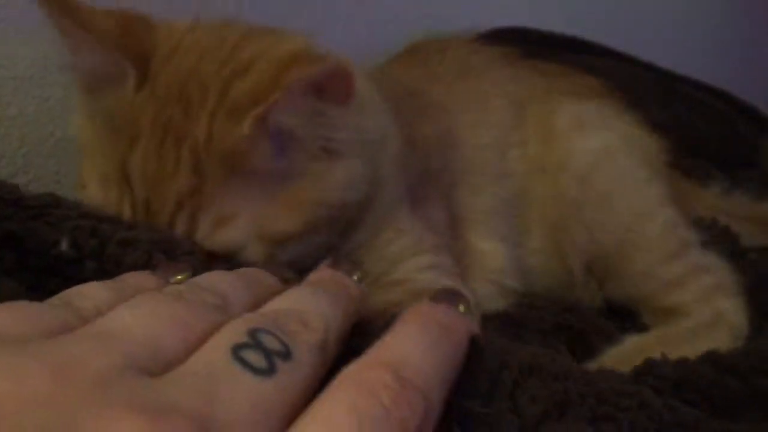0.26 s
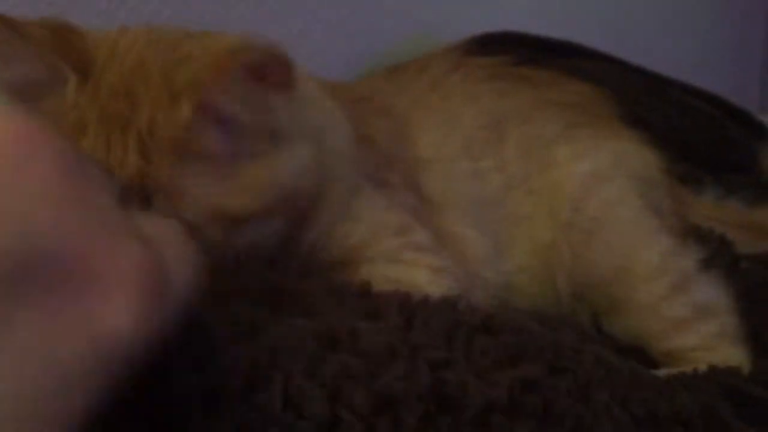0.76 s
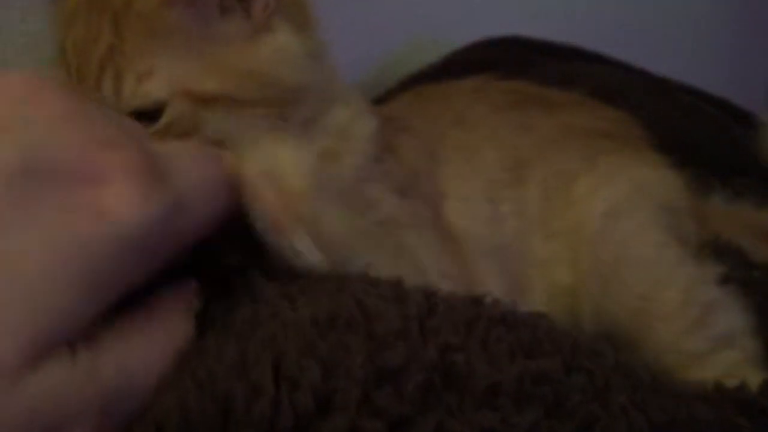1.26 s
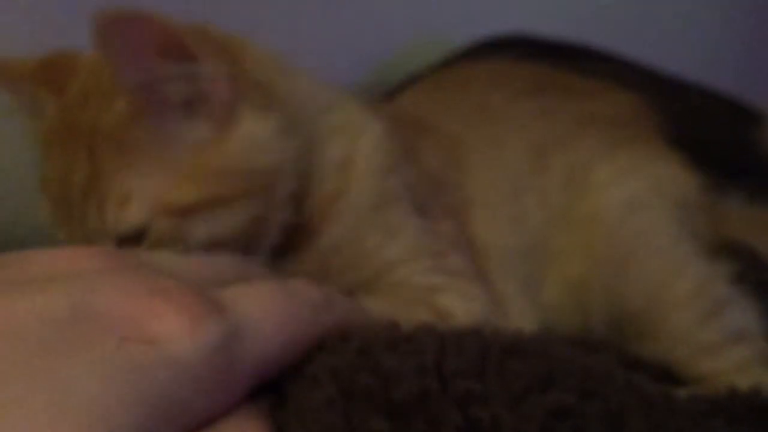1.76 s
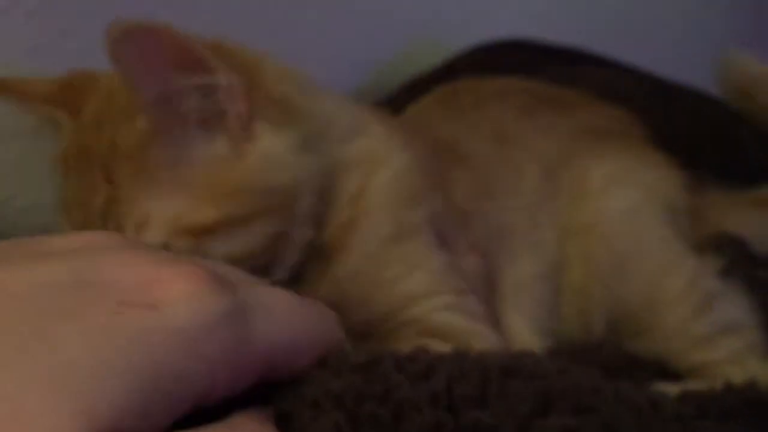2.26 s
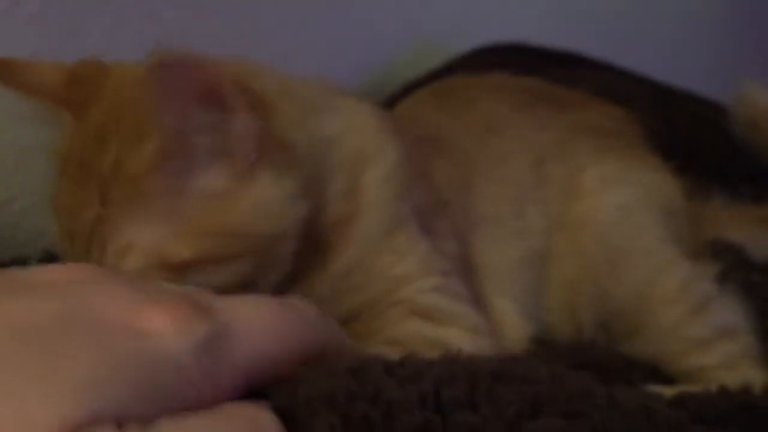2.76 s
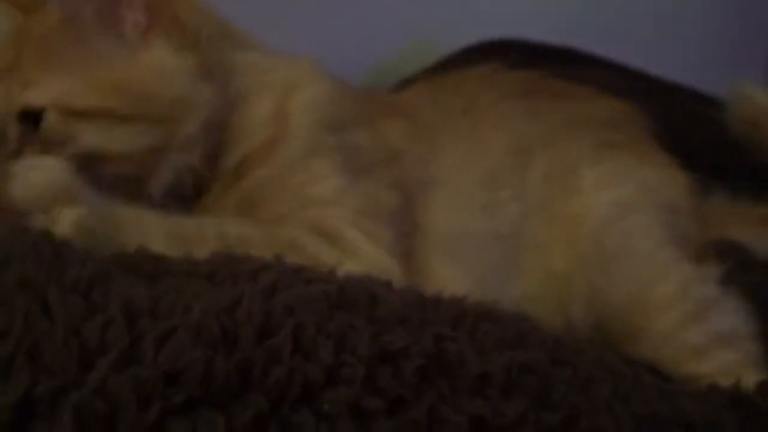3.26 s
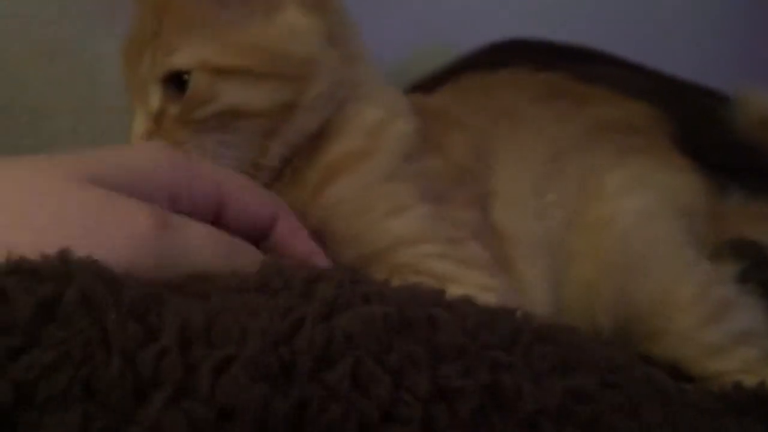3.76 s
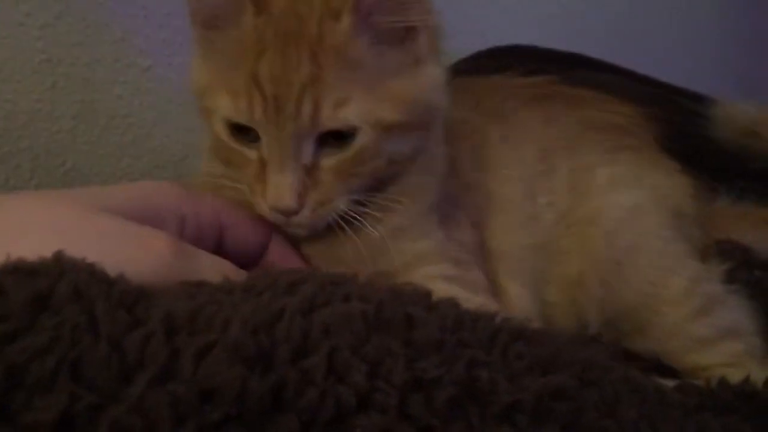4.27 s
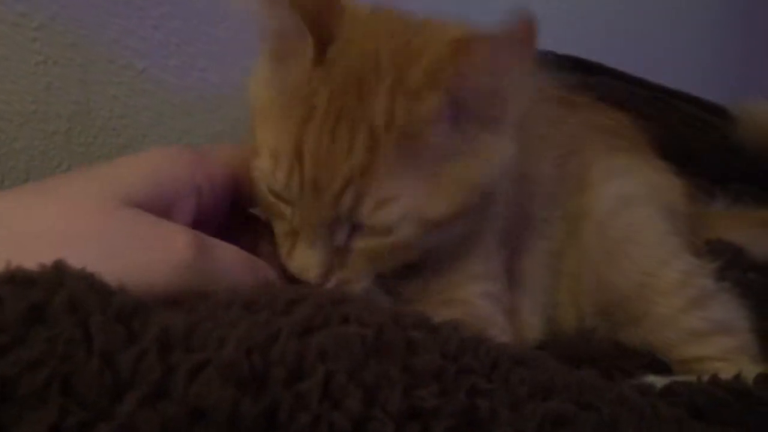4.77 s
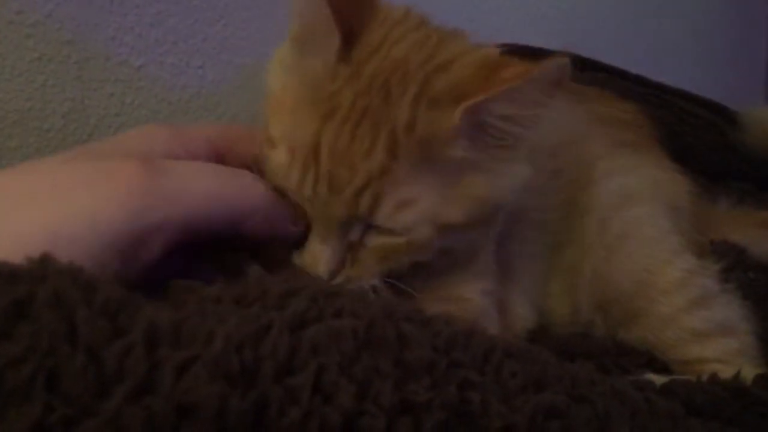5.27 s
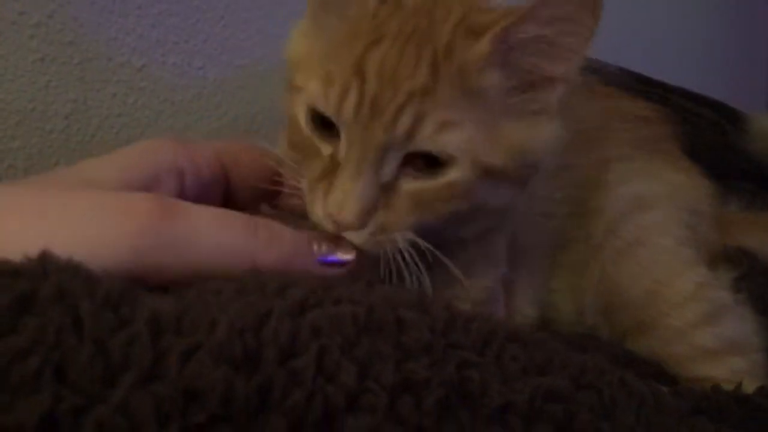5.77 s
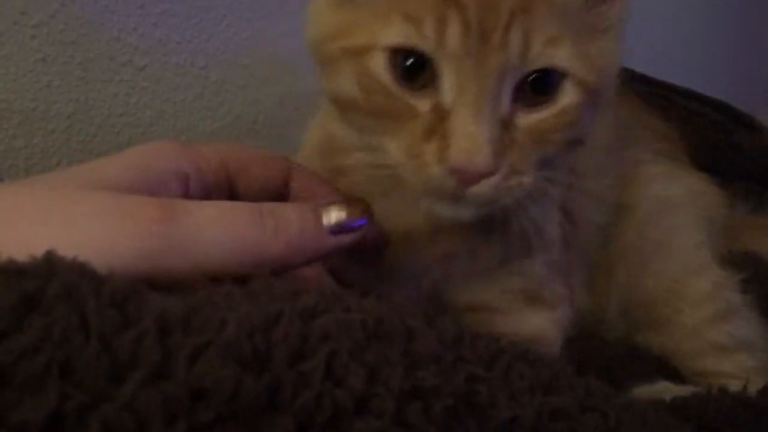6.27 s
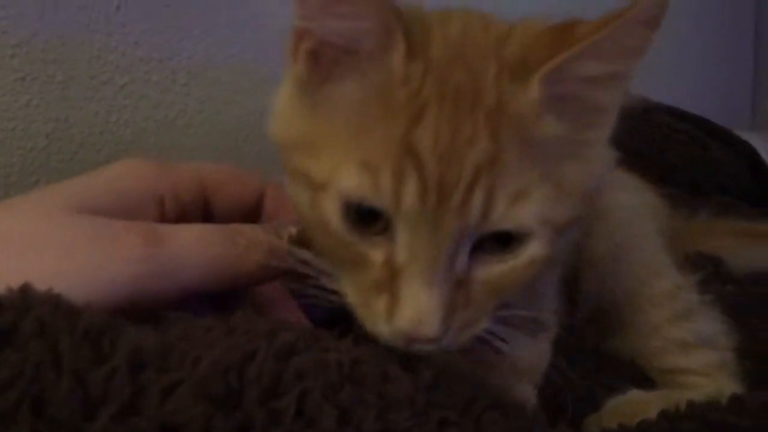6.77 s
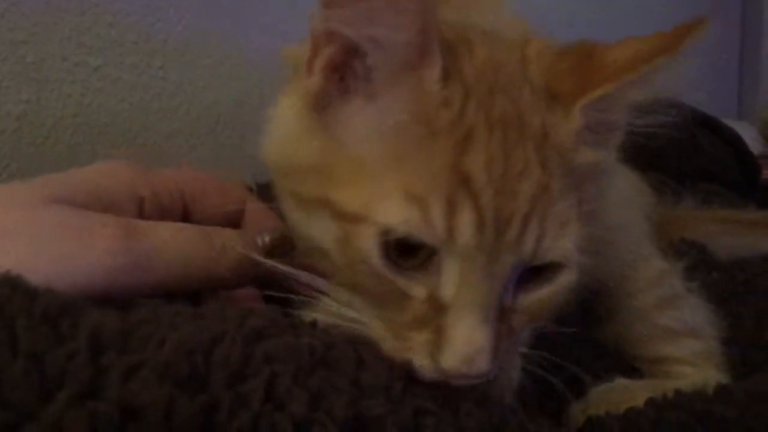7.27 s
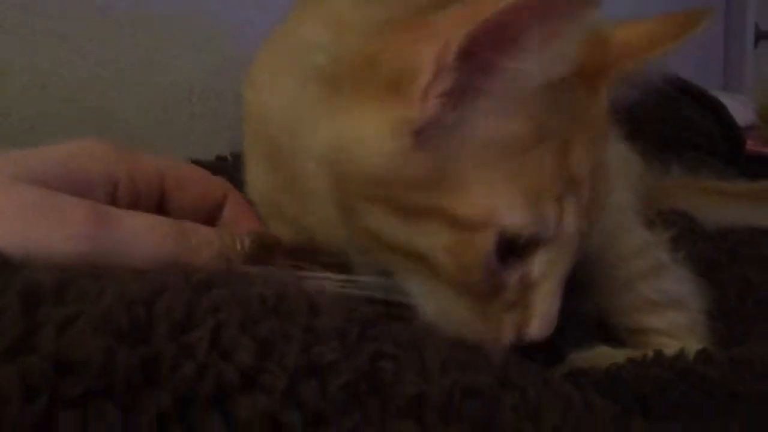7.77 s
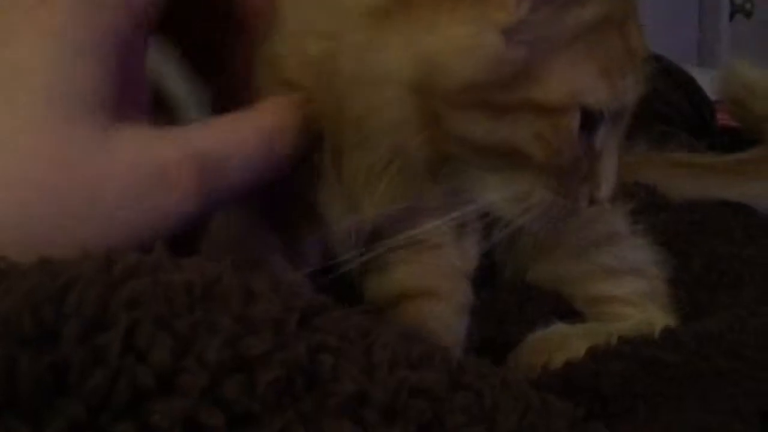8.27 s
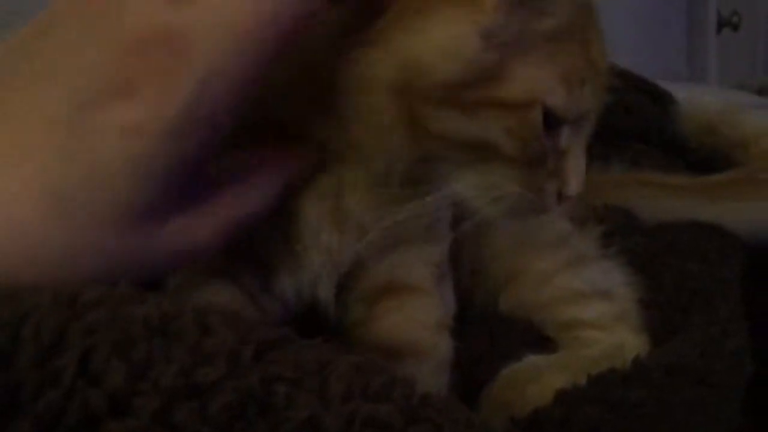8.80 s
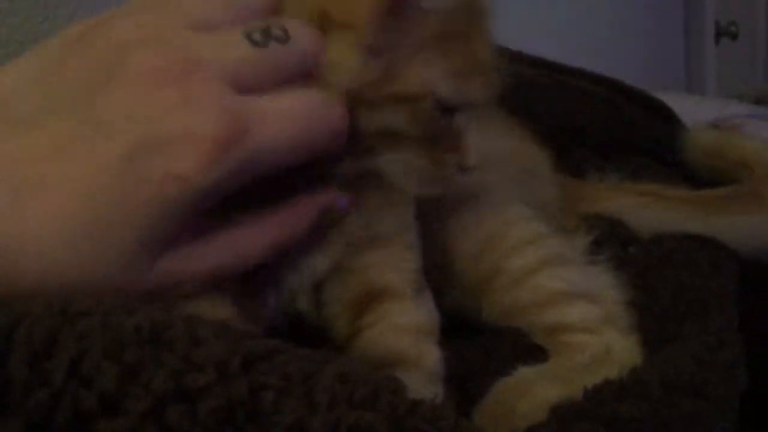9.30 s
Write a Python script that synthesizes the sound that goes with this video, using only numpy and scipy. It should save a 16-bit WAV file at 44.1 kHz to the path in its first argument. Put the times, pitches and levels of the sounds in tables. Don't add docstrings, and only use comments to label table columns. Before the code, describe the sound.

Close, soft kitten purring pulses in and out over faint hum and hiss, interrupted by small ticks, blanket bumps and a few sharp dry knocks.

```python
import sys
import numpy as np
from scipy import signal
from scipy.io import wavfile
from scipy.ndimage import uniform_filter1d

SR = 44100
rng = np.random.default_rng(int(sys.argv[2]) if len(sys.argv) > 2 else 0)


def digitize_waveform(pressure):
    field = np.atleast_2d(pressure).T
    bounded = np.clip(field, -1, 1)
    quanta = np.round(bounded * 32767).astype(np.int16)
    wavfile.write(sys.argv[1], SR, quanta)


def to_linear_factor(level_db):
    exponent = np.asarray(level_db, float) / 20
    return 10 ** exponent


N = 420713


def evened(x):
    return x / np.sqrt(np.mean(x ** 2) + 1e-20)


def read(points, hz):
    f, value = np.transpose(points)
    return np.interp(np.log(hz + 1), np.log(f + 1), value)


def add(mix, s, sound):
    part = mix[max(round(s * SR), 0):][:len(sound)]
    part += sound[:len(part)]


def resonate(x, hz, width, order=1):
    turn = np.exp(2j * np.pi * np.cumsum(hz * np.ones(len(x))) / SR)
    r = np.exp(-np.pi * width / SR)
    low = x / turn
    for _ in range(order):
        low = signal.lfilter([1 - r], [1, -r], low)
    return 2 * (turn * low).real


def steep(x, hz, width):
    return resonate(x, hz, width, order=4)


def hiss():
    # frequency in Hz, level in dB.
    floor_colour = [(82, -38), (140, -2.5), (164, -3.5), (204, -9), (259, -14), (328, -28.5), (425, -26),
                    (632, -31), (786, -29.5), (1700, -32.5), (4870, -41.5), (5590, -41), (8830, -44),
                    (15100, -48), (16000, -56.5)]
    level_db = -74
    frames, hz = N // 256 + 5, np.fft.rfftfreq(1024, 1 / SR)
    a, b, patches = rng.standard_normal((frames, 513, 3)).T
    patches = evened(uniform_filter1d(uniform_filter1d(patches, 12, 0), 14, 1))
    z = (a + 1j * b) * to_linear_factor(read(floor_colour, hz)[:, None] + 0.8 * patches)
    upper = z * (hz > 1000)[:, None]
    scale = np.std(signal.istft(upper, nperseg=1024, noverlap=768)[1])
    return to_linear_factor(level_db) * signal.istft(z, nperseg=1024, noverlap=768)[1][:N] / scale


def slow_drift():
    return evened(resonate(rng.standard_normal(N), 0, 3.53))


def hum():
    # frequency in Hz, wander in Hz, level in dB.
    hum_lines = [(50.3, 2.1, -61), (58.86, 1.83, -61), (119.8, 0.64, -51.5)]
    # centre in Hz, width in Hz, level in dB.
    rumble = [(51.4, 8.9, -62), (97, 64, -64.5), (125, 18.6, -62.5), (33.2, 44, -79.5)]
    out = np.zeros(N)
    for hz, wander, db in hum_lines:
        level = to_linear_factor(db - 0.5 + 2.0 * slow_drift())
        out += level * np.sin(2 * np.pi * np.cumsum(hz + wander * slow_drift()) / SR)
    for hz, width, db in rumble:
        out += to_linear_factor(db) * evened(resonate(rng.standard_normal(N), hz, width, order=2))
    return out


def room_tail():
    # frequency in Hz, time to fall 60 dB in seconds.
    decay = [(500, 0.22), (1500, 0.25), (4000, 0.19), (8000, .14), (15000, 0.081)]
    # delay in seconds, level in dB.
    echoes = [(.006, 4), (0.01, -3.5), (0.02, -2.5), (.022, -9.5), (.031, -11.5)]
    taps = np.zeros(SR // 2)
    at = np.arange(140, len(taps) - 20, 20)
    taps[at + rng.integers(0, 20, len(at))] = rng.choice([-1., 1.], len(at))
    hz, t, z = signal.stft(taps, SR, nperseg=256)
    tail = signal.istft(z * to_linear_factor(-60 * t / read(decay, hz)[:, None]), SR, nperseg=256)[1]
    tail /= np.linalg.norm(tail)
    for s, db in echoes:
        smear = uniform_filter1d(rng.standard_normal(160), 3) * np.exp(-np.arange(160) / 22)
        add(tail, s, 0.54 * to_linear_factor(db) * smear / np.linalg.norm(smear))
    return tail


def bumps():
    # start in seconds, peak in dB, ring in Hz.
    thuds = [(1.406, -34.5, 131), (1.438, -39, 131), (2.881, -31.5, 134), (4.607, -36.5, 187),
             (5.049, -34.5, 125), (5.363, -40.5, 113), (7.461, -33, 154), (7.783, -38.5, 140),
             (7.816, -32, 127)]
    out, t = np.zeros(N), np.arange(3000) / SR
    envelope = np.exp(-t / 0.016) * (1 - np.exp(-t / 0.0027))
    for s, db, hz in thuds:
        add(out, s, to_linear_factor(db) * np.sin(2 * np.pi * hz * t) * envelope)
    return out


def fur():
    # start, firmest moment and end in seconds, level in dB, pitch in Hz.
    strokes = [(0.702, 0.79, 0.93, -71, 3870), (0.928, 1.1, 1.22, -78, 4000),
               (1.28, 1.366, 1.46, -75, 4250), (3.044, 3.208, 3.45, -73, 3300),
               (6.745, 7.06, 7.15, -74.5, 4370), (8.252, 8.436, 8.4, -77, 4300),
               (8.517, 8.62, 8.72, -77, 4800), (8.696, 8.923, 9.3, -77, 4420), (8.997, 9.2, 11, -85, 4500)]
    ends_db, grains_per_s = -10, 5000
    out = np.zeros(N)
    for start, firm, end, db, hz in strokes:
        t = np.arange(start, end, 1 / SR)
        strength = to_linear_factor(1.9 * rng.exponential(1, len(t)))
        slips = rng.random(len(t)) < grains_per_s / SR
        grains = strength * slips * rng.standard_normal(len(t))
        press_db = np.interp(t, (start, firm, end), (ends_db, 0, ends_db))
        rub = evened(resonate(grains, hz, 5600, order=2))
        add(out, start, to_linear_factor(db + press_db) * rub * signal.windows.tukey(len(t), 0.1))
    return out


def tick(db, hz, treble_db, treble_hz):
    t = np.arange(1024) / SR
    crack = rng.standard_normal((2, len(t))) * np.exp(-t / 0.0042)
    ring = steep(crack[0], hz, 940)
    treble = steep(crack[1], treble_hz, 3350) + 0.3 * steep(crack[1], 8150, 7900)
    return to_linear_factor(db) * ring / abs(ring).max() + to_linear_factor(treble_db) * treble / abs(treble).max()


def knock(db, bare, modes):
    t = np.arange(1024) / SR
    blow = np.exp(-((t - 0.0008) / 0.00004) ** 2)
    rings = np.zeros(len(t))
    for k, (hz, width, mode_db) in enumerate(modes):
        rings += (-1) ** k * to_linear_factor(mode_db) * resonate(blow, hz, 2.67 * width, order=2)
    burst = np.clip((t - 0.0007) / 0.0001, 0, 1) * np.exp(-t / 0.0016)
    crack = resonate(np.gradient(rng.standard_normal(len(t))) * burst, 2940, 5900, order=2)
    sound = rings / abs(rings).max() + bare * crack / abs(crack).max()
    return to_linear_factor(db) * sound / abs(sound).max()


def clicks():
    # start in seconds, peak in dB, ring in Hz, treble in dB, treble in Hz.
    near_ticks = [(0.0592, -49, 1880, -71, 5410), (1.2132, -45, 1440, -79, 3750),
                  (1.4078, -48.5, 1140, -53.5, 4500), (1.411, -54, 2270, -70, 3000),
                  (1.5702, -48.5, 1590, -56.5, 5330), (1.578, -55, 1170, -80, 3000),
                  (2.884, -57.5, 2500, -66, 3400), (4.165, -65, 1700, -78, 4400),
                  (7.319, -52.5, 1800, -67, 4400), (1.88, -66, 897, -59.5, 5600),
                  (1.921, -69, 1250, -58.5, 6060), (2.49, -55.5, 1630, -81, 4350),
                  (2.802, -64, 1390, -59, 5800), (2.88, -45, 1450, -46.5, 6380),
                  (4.109, -69, 1570, -57, 12000), (4.144, -57, 1650, -76, 4410),
                  (5.7984, -73, 931, -58.5, 7500), (6.2426, -51.5, 1420, -46, 4670),
                  (8.4268, -54, 1280, -54.5, 4260), (8.5237, -61, 902, -56, 13300),
                  (8.9227, -56, 1240, -47, 5440)]
    far_ticks = [(0.7355, -61.5, 2440, -64, 3580), (0.7494, -62, 1330, -56, 4600),
                 (0.7922, -59, 1240, -61.5, 4440), (0.843, -62, 1120, -63.5, 3670),
                 (2.2487, -71, 1120, -65, 6000), (4.527, -69, 2260, -77, 4100),
                 (5.028, -67, 930, -65, 4530), (6.645, -62, 2470, -49.5, 4960),
                 (6.96, -64, 2300, -64, 3590), (8.479, -62.5, 2300, -62, 4380),
                 (8.877, -57.5, 1630, -58, 4980), (9.0856, -69, 900, -71, 4660),
                 (9.1746, -82, 1030, -72, 3690)]
    # start in seconds, peak in dB, room send in dB, share of bare crack.
    knocks = [
        (4.601, -21.5, -4, 0.46),
        (5.3579, -33.5, -5.5, 0.24),
        (7.4642, -17.5, -6.5, 0.32),
        (7.78, -25, -2.5, 0.23),
    ]
    # frequency in Hz, width in Hz, level in dB.
    knock_modes = [
        [(1400, 310, -0.5), (2500, 280, 3), (3540, 200, -4), (4250, 220, -4.5), (5440, 330, -7),
         (6060, 160, -4), (6600, 230, -5), (7440, 160, -2), (9000, 160, -5), (10000, 420, 6.5)],
        [(1630, 430, -1.5), (2330, 120, 2), (2860, 390, -8), (4350, 83, -10), (5330, 130, -14),
         (7550, 100, -26), (9700, 120, -6)],
        [(1250, 154, -1.5), (1800, 120, -6), (2226, 155, -3), (3030, 170, -10), (4170, 180, -10),
         (5210, 150, -4), (6000, 130, -11), (7180, 230, -12.5), (11160, 81, -27)],
        [(1540, 280, 3), (2500, 210, -3), (3180, 210, -9.5), (4350, 140, -5), (5550, 110, -3), (8200, 100, -22),
         (9500, 110, -29), (10100, 74, -36)],
    ]
    near_room_db, far_room_db = -6.5, 1.5
    dry_part, sent = np.zeros(N), np.zeros(N)
    ticks = [(*row, near_room_db) for row in near_ticks] + [(*row, far_room_db) for row in far_ticks]
    sounds = [(s, tick(*settings), room_db) for s, *settings, room_db in sorted(ticks)]
    for (s, db, room_db, bare), modes in zip(knocks, knock_modes):
        sounds.append((s, knock(db, bare, modes), room_db))
    for s, sound, room_db in sounds:
        add(dry_part, s, sound)
        add(sent, s, to_linear_factor(room_db) * sound)
    return dry_part + signal.oaconvolve(sent, room_tail())[:N]


def vocal_folds(first, last, rate, flutter, bend):
    inward = flutter > 0.3
    cycles = max(round((last - first) * rate), 1)
    u = np.arange(cycles + 1) / cycles
    period, pad = (last - first) / cycles, 0.03
    chance = rng.standard_normal((cycles + 1, 4))
    jitter = (0.0004 + 0.001 * flutter) * chance[:, 0]
    shut = pad + (last - first) * (u + bend * u * (1 - u)) + jitter
    part = shut + period * ((-0.4 if inward else 0.54) + 0.0243 * chance[:, 1])
    n = round((last - first + 4 * pad) * SR)
    slaps, partings, gap, flow = np.zeros((4, n))
    slaps[(shut * SR).astype(int)] = to_linear_factor((1.8 + 2 * flutter) * chance[:, 2])
    partings[(part * SR).astype(int)] = to_linear_factor(3.5 * chance[:, 3])
    for a, b in zip(shut, part):
        gap[int(min(a, b) * SR):int(max(a, b) * SR)] = 1
    leak = inward * (0.35 + 1.0 * abs(1 - flutter))
    flow[int(min(part[0], shut[0]) * SR):int(shut[-1] * SR)] = leak
    air = uniform_filter1d(gap + flow, 150) * rng.standard_normal(n) * (0.012 + 0.04 * flutter)
    start = first - pad - 0.002 + 0.0005 * inward
    return start, slaps, partings, air


def palate(x):
    # frequency in Hz, width in Hz, level in dB.
    palate_modes = [(1746, 650, 1), (1250, 860, 3), (5600, 1000, -13)]
    return evened(sum((-1) ** k * to_linear_factor(db) * steep(x, hz, width)
                      for k, (hz, width, db) in enumerate(palate_modes)))


def half_breath(first, last, rate, chest_db, nose_db, flutter, bend, chest_hz, chest_swell_db, nose_swell_db, lift):
    # time in seconds, effort in dB.
    effort = [(1.2, 0), (1.41, 2.5), (1.56, -1.5), (1.7, 0.5), (3.1, -0.5), (3.25, 2.5), (3.43, -1),
              (4.05, -5.5), (4.2, 1), (4.9, -2.5), (5.05, 1), (5.6, -4.5), (5.7, 0), (6.95, 0),
              (7.09, -3.5), (7.35, 0.5), (7.47, -1.5), (8.4, 2)]
    # time in seconds, palate snap in dB, nose ring in Hz.
    mouth = [(0, -69, 624), (0.3, -84, 570), (1.0, -79.5, 652), (1.5, -79, 554), (2.35, -88, 642),
             (2.7, -81, 576), (3.3, -77.5, 595), (3.75, -75, 600), (4.5, -68, 593), (5.0, -93, 635),
             (5.67, -72.5, 605), (6.2, -72, 590), (6.9, -67, 605), (7.4, -62.5, 663), (8.0, -68.5, 620),
             (8.5, -75.5, 612), (9.2, -74, 658), (9.54, -65, 640)]
    inward = flutter > 0.3
    start, slaps, partings, air = vocal_folds(first, last, rate, flutter, bend)
    t = start + np.arange(len(air)) / SR
    done = np.clip((t - first) / (last - first), 0, 1)

    attack = np.clip(1 - (t - first) / 0.043, 0, 2)
    effort_db = np.interp(t, *np.transpose(effort))
    shape_db = -1.5 * attack - 213 * np.maximum(t - last, 0) + effort_db
    chest_db = chest_db + shape_db + chest_swell_db * (done - 0.5)
    nose_db = nose_db + shape_db + nose_swell_db * (done - 0.5)
    nose_db = nose_db + 0.32 * effort_db - 2.5 * attack
    s, snap_db, nose_hz = np.transpose(mouth)
    snap_db = np.minimum(np.interp(t, s, snap_db), nose_db - 8)
    nose_hz = np.interp(t, s, nose_hz) * (1 + lift * (done - 0.5))
    chest_hz = chest_hz[0] + (chest_hz[1] - chest_hz[0]) * done
    chest_hz = chest_hz * (1 + 0.09 * flutter * np.maximum(effort_db, -1))

    thump = (0.55 * slaps + partings if inward else slaps + 0.3 * partings) + air
    chest = -steep(thump, chest_hz, 270 - 50 * flutter)
    chest = chest + (0.021 + 0.046 * flutter) * steep(thump, 390, 220)
    buzz = slaps + 0.55 * partings + air
    nose = steep(buzz, nose_hz, 460 - 210 * flutter) - 0.22 * steep(buzz, 487, 330)
    snap = palate((0.42 + 0.87 * flutter) * slaps + partings + 0.89 * air)
    return start, to_linear_factor(chest_db) * evened(chest) + to_linear_factor(nose_db) * evened(nose) + to_linear_factor(snap_db) * snap


def purr():
    # first and last pulse in seconds, pulses per second, chest in dB, nose in dB.
    out_breaths = [(0.183, 0.405, 26.7, -48, -69), (0.62, 0.691, 28.5, -50, -75),
                   (1.166, 1.206, 25, -53, -92), (1.656, 2.014, 28, -47, -72),
                   (2.498, 2.755, 27.2, -46, -71), (3.05, 3.107, 17, -55.5, -76.5),
                   (4.001, 4.337, 26.8, -51.5, -77.5), (4.377, 4.715, 29.3, -49, -68),
                   (5.175, 5.249, 26.5, -50, -75), (5.843, 5.956, 26.3, -52, -72),
                   (6.123, 6.277, 26.6, -50.5, -64), (6.742, 7.097, 28.9, -45.5, -56.5),
                   (7.621, 7.69, 30.8, -49, -62.5), (8.325, 8.67, 30.3, -49, -62),
                   (9.404, 9.507, 10, -59.5, -75)]
    in_breaths = [(0.025, 0.09, 31.8, -49.5, -56), (0.897, 1.066, 36.2, -56, -67),
                  (1.406, 1.557, 32.1, -52.5, -66), (2.263, 2.414, 34, -53.5, -62),
                  (3.221, 3.439, 36.4, -53.5, -63), (3.549, 3.97, 30, -47.5, -59),
                  (4.909, 5.089, 30.2, -59, -71), (5.598, 5.747, 32.6, -48.5, -57.5),
                  (6.46, 6.65, 34.7, -56, -52.5), (7.341, 7.498, 31.5, -50, -51),
                  (7.848, 8.196, 33.9, -56, -53), (8.973, 9.375, 31.1, -59.5, -54)]
    outward = dict(flutter=0.047, bend=0.0502, chest_hz=(183.3, 185.7),
                   chest_swell_db=1, nose_swell_db=1, lift=-0.023)
    inward = dict(flutter=0.88, bend=-0.0392, chest_hz=(234, 220),
                  chest_swell_db=0, nose_swell_db=-1.8, lift=0.066)
    out, lead = np.zeros(N + SR), 1
    rows = [(row, outward) for row in out_breaths] + [(row, inward) for row in in_breaths]
    for row, way in sorted(rows, key=lambda pair: pair[0][0]):
        s, sound = half_breath(*row, **way)
        add(out, s + lead, sound)
    return out[SR:]


def scene():
    cat = purr()
    cat = cat + to_linear_factor(-22.5) * signal.oaconvolve(cat, room_tail())[:N]
    return (cat + clicks() + bumps() + fur() + hum() + hiss())[None]


def top_cut(x):
    return signal.sosfilt(signal.butter(12, 16450, fs=SR, output="sos"), x)


def record(dry):
    # frequency in Hz, width in Hz, depth as a share.
    port_dips = [(4950, 167, 0.58), (7530, 340, 0.26), (10500, 330, 0.45)]
    x = signal.sosfilt(signal.butter(2, 40, "high", fs=SR, output="sos"), dry[0])
    x = signal.sosfilt(signal.butter(8, 15600, fs=SR, output="sos"), x)
    for hz, width, depth in port_dips:
        x = x - depth * resonate(x, hz, width)
    return top_cut(x[None])


dry = scene()
out = record(dry)
digitize_waveform(out)
```